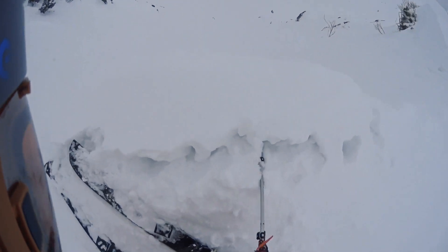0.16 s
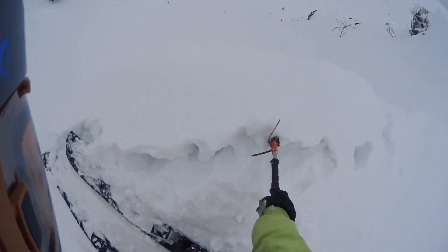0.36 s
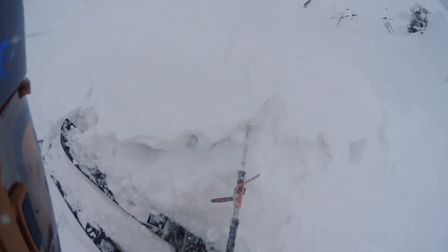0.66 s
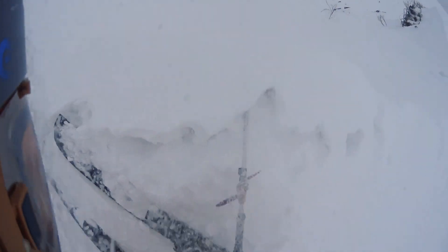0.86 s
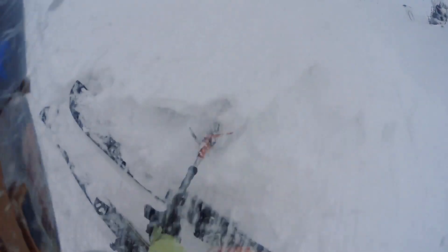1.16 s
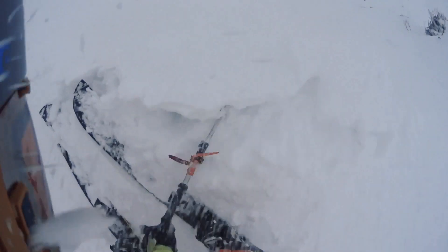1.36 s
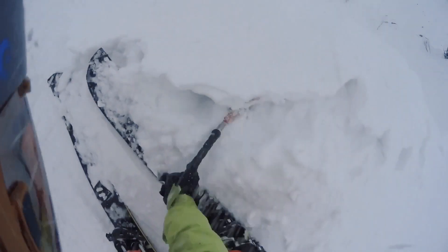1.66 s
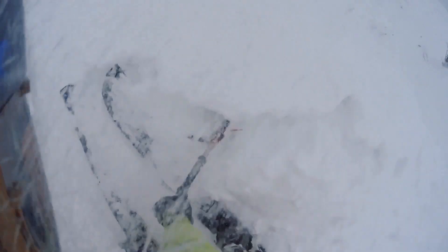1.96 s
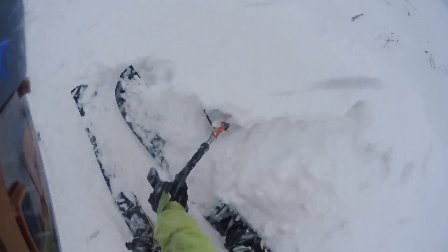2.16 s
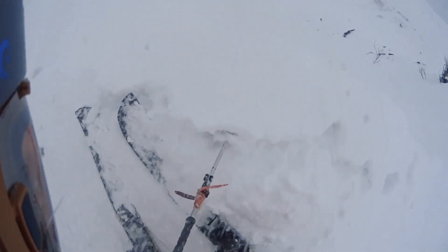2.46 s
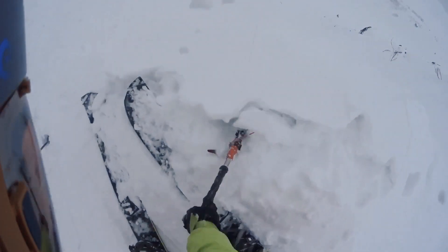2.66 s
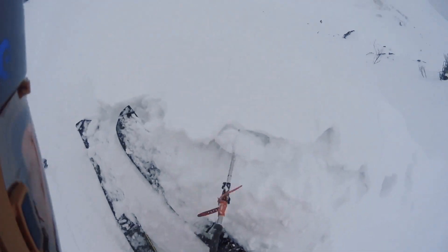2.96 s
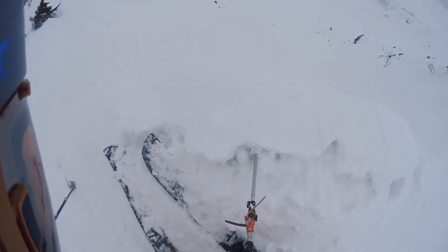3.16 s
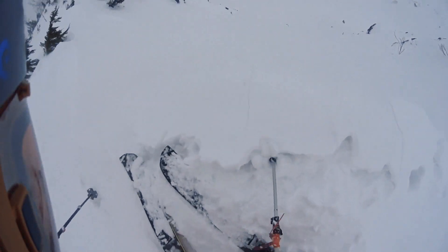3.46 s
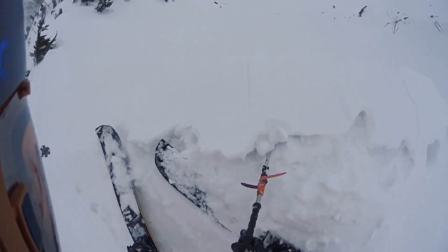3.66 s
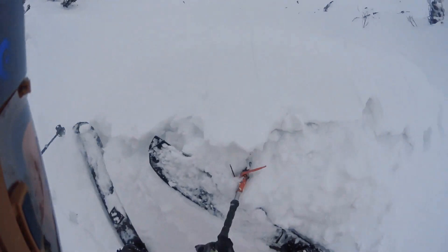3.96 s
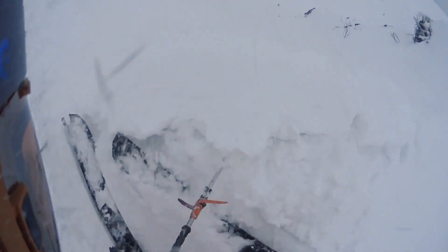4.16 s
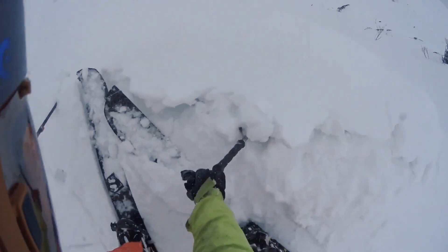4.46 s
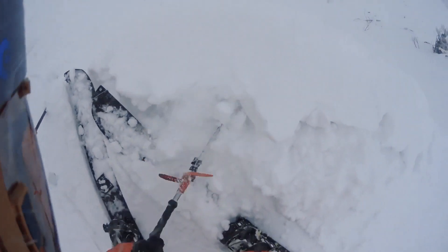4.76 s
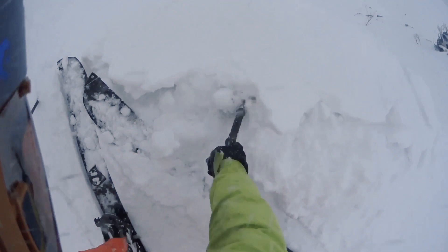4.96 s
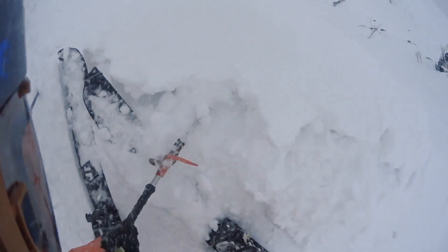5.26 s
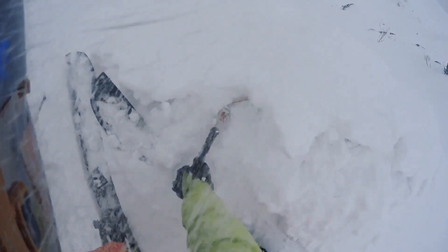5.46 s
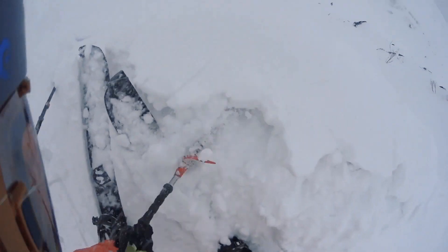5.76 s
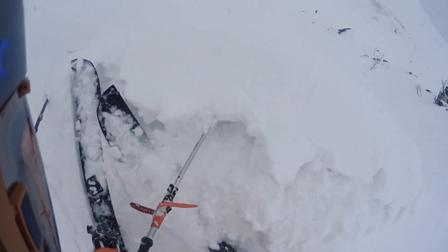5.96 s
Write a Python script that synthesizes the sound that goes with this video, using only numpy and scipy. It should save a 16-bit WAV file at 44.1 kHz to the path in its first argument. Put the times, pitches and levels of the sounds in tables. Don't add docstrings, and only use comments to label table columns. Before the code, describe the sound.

Outdoors in a snowstorm, a small body-worn camera is buffeted by low, throbbing wind. Driven snow hisses in ragged puffs over its shell, with small thuds, glassy pings and sharp ice ticks. The impacts thin out around three seconds, leaving mostly wind, then return as a dense crackling flurry after four seconds before easing at the end. Very close stereo, the sharpest ticks mostly on the right.

```python
import sys
import numpy as np
from scipy import signal
from scipy.fft import rfft, irfft
from scipy.io import wavfile
from scipy.ndimage import uniform_filter1d

SR = 44100
rng = np.random.default_rng(int(sys.argv[2]) if len(sys.argv) > 2 else 0)


def how_loud(loudness_db):
    steps = np.asarray(loudness_db, float) / 20
    return 10 ** steps


def store_wav(level_fs):
    pcm = np.round(np.clip(np.atleast_2d(level_fs), -1, 1) * 32767)
    wavfile.write(sys.argv[1], SR, pcm.T.astype(np.int16))


N = 269451
T = np.arange(N) / SR
HZ = np.fft.rfftfreq(N, 1 / SR) + 1e-3


def unit(x):
    return x / np.sqrt(np.mean(x ** 2))


def walk(rate_hz):
    hold = int(SR / rate_hz)
    steps = np.repeat(rng.standard_normal(N // hold + 1), hold)
    smooth = uniform_filter1d(uniform_filter1d(steps, hold), hold)
    return 0.7 * smooth[:N]


def curves(table):
    time_s, *columns = np.transpose(table)
    return [np.interp(T, time_s, column) for column in columns]


def bumps(table):
    out = np.zeros((2, N))
    for middle_s, length_s, *change_db in table:
        slope_share = 0.58 if change_db[0] < 0 else 1
        near = slice(max(int((middle_s - length_s) * SR), 0), int((middle_s + length_s) * SR))
        height = 1 - 2 * np.abs(T[near] - middle_s) / length_s
        out[:, near] += np.outer(change_db, np.clip(height / slope_share, 0, 1))
    return out


def ring(x, modes):
    out = 0
    for k, (pitch_hz, width_hz, level_db) in enumerate(modes):
        resonance = signal.iirpeak(pitch_hz, pitch_hz / width_hz, SR)
        out = out + (-1) ** k * how_loud(level_db) * signal.lfilter(*resonance, x)
    return out


def grains(per_s, spread_db):
    arrival, sign, size = rng.random((3, N))
    clicks = (arrival < per_s / SR) * np.sign(sign - 0.5)
    return unit(clicks * how_loud(-spread_db * np.log(1.002 - size)))


def add(out, start_s, near, far, level_db, pan_db, lag=7):
    i, struck = int(start_s * SR), int(pan_db < 0)
    out[struck, i:i + len(near)] += near * how_loud(level_db) / np.abs(near).max()
    far_level = how_loud(level_db - abs(pan_db))
    out[1 - struck, i + lag:i + lag + len(far)] += far * far_level / np.abs(far).max()


def rumble(deep_db, flutter_db, gap_db):
    # pitch_hz [Hz], level_db [dB per Hz]
    eddy_colour = [(20, -24), (45, -4), (80, -2.5), (140, 0.5), (250, -2.5), (400, -7), (700, -13.5),
                   (1100, -27), (1800, -27), (2400, -62.5), (3000, -34), (4000, -33.5), (11000, -49.5)]
    pitch_hz, level_db = np.transpose(eddy_colour)
    colour = how_loud(np.interp(np.log(HZ), np.log(pitch_hz), level_db))
    shared, left, right = rfft([grains(900, 1.97) for _ in range(3)]) * colour
    own = np.clip((HZ / 3200) ** 2 + 0.022, 0, 1)
    lag_s = np.array([[0], [0.00068]])
    pair = np.sqrt(1 - own) * shared * np.exp(-2j * np.pi * HZ * lag_s)
    pair = pair + np.sqrt(own) * np.array([left, right])
    pair = pair / np.std(irfft(pair, N))
    throb_db = 1.6 * walk(24.82) + 2.0 * walk(60)
    out = 0
    for octave in range(9):
        place = np.clip(np.log2(HZ / 40), 0, 8) - octave
        band = irfft(pair * np.cos(np.pi / 2 * np.clip(place, -1, 1)) ** 2, N)
        gust_db = deep_db + 4.5 if octave < 2 else flutter_db + 5.0
        if octave < 6:
            gust_db = gust_db + 0.4 * max(octave - 3, 0) * (flutter_db + gap_db + 31)
        out = out + band * how_loud(gust_db + throb_db + 4.1 * walk(30))
    return out


def at_ports(shared, left, right):
    # pitch_hz [Hz], alike [0-1], left_lead [radians], left_minus_right_db [dB]
    port_hiss = [(1240, 1, 2.01, -1), (1920, 1, 1.23, -3.5), (3030, 1, 2, -6), (4020, 0.84, 1.26, -3.5),
                 (5200, 0.32, 2, -3), (6400, 0.55, 3, -3.5), (8700, 0.54, 2, -3), (8800, 0, 4.5, -2),
                 (10500, 0.5, -7.5, -0.5)]
    pitch_hz, *columns = np.transpose(port_hiss)
    alike, lead, pan_db = (np.interp(HZ, pitch_hz, column) for column in columns)
    alike = np.clip(alike, 0, 1)
    turn = np.array([np.ones_like(lead), np.exp(-1j * lead)])
    both = np.sqrt(alike) * rfft(shared) * turn
    local = np.sqrt(1 - alike) * rfft([left, right])
    return irfft((both + local) * how_loud(np.array([pan_db, -pan_db]) / 2), N)


def snow(shell_db, port_db, spray_db):
    # pitch_hz [Hz], width_hz [Hz], level_db [dB]
    shell_modes = [(1550, 446, 4.5), (1897, 358, 6.5), (2197, 183, 5.5)]
    port_modes = [(2832, 590, 0)]
    spray_modes = [(4035, 470, -1.5), (5300, 820, -1), (6170, 1200, 1), (7180, 1530, -0.5),
                   (8490, 1830, -7), (11000, 880, -10)]
    patchy = how_loud(1.07 * walk(30) + 0.75 * walk(70) + 2.85 * walk(160))
    on_shell, on_port, on_grille = (
        at_ports(*(grains(7000, 3.66) * patchy for _ in range(3))) for _ in range(3))
    shell = unit(ring(ring(on_shell, [(1670, 13000, 0)]), shell_modes))
    shell = shell * how_loud(shell_db + 1.5 + 2.0 * walk(50))
    port = unit(ring(ring(on_port, [(3100, 1500, 0)]), port_modes))
    port = port * how_loud(port_db - 0.42 + 1.8 * walk(50))
    low_spray = ring(on_grille, spray_modes[:2]) * how_loud(1.7 * walk(50))
    high_spray = ring(on_grille, spray_modes[2:]) * how_loud(1.7 * walk(45))
    spray = unit(low_spray + high_spray) * how_loud(spray_db + 3.0)
    lull_db = np.minimum(spray_db + 41.5, 0)
    far = signal.lfilter([1, -0.5], 1, rng.standard_normal((2, N))) * how_loud(lull_db - 38.0)
    return shell + port + spray * how_loud(0.1 * lull_db) + far


def pings():
    # start_s [s], level_db [peak dB]
    ping_list = [(1.081, -22), (1.2825, -17), (1.464, -11), (1.56, -13), (1.8143, -16), (2.1585, -16),
                 (2.27, -15), (2.5107, -18), (2.6339, -21), (2.644, -22), (2.684, -23), (2.696, -22),
                 (2.7297, -14), (2.744, -19), (4.6164, -21), (4.7272, -15), (4.912, -16), (5.6517, -17)]
    out, t = np.zeros((2, N)), T[:700]
    sound = np.sin(2 * np.pi * 4110 * t) * (1 - np.exp(-t / 0.0006)) * np.exp(-t / 0.0019)
    for start_s, level_db in ping_list:
        add(out, start_s, sound, sound, level_db + 2.0, pan_db=-4.5)
    return out


def knocks():
    # start_s [s], level_db [peak dB], pitch_hz [Hz]
    knock_list = [(.145, -14, 2000), (0.431, -11, 1780), (.5005, -12, 2190), (0.586, -18, 1860),
                  (0.7498, -10, 1540), (.8207, -15, 910), (0.8207, -13, 1300), (0.821, -9, 1900),
                  (0.998, -10.5, 1600), (1.2692, -11.5, 1550), (1.499, -9, 1500), (1.5484, -6, 1900),
                  (1.74, -8.5, 2180), (1.759, -12, 1620), (2.103, -10, 1530), (2.165, -14, 1620),
                  (2.1827, -3.5, 1690), (2.2692, -10.5, 2020), (2.4163, -16.5, 1740), (2.521, -11, 1800),
                  (2.529, -9, 1650), (2.5744, -3, 1720), (2.6727, -10, 1640), (3.7962, -10, 1730),
                  (4.0422, -9, 1810), (5.917, -18, 1600), (5.924, -18, 1490), (5.941, -27, 1150),
                  (5.953, -31, 950), (6.012, -29, 1500), (5.86, -32, 1600), (2.472, -30, 790),
                  (2.482, -31, 900), (2.2902, -19, 1850), (2.3252, -23, 2100), (2.4557, -24, 1500),
                  (2.7986, -25, 1870), (2.7262, -16, 1540), (.61, -14, 1730), (.9243, -20, 1650),
                  (1.068, -19, 1740), (1.3318, -8, 1780), (1.602, -9, 1830), (1.9987, -16, 1830),
                  (4.171, -11.5, 1530), (4.183, -10, 1610), (4.315, -14, 1820), (4.3352, -11, 1700),
                  (4.46, -18, 1650), (4.5316, -14, 1990), (4.6523, -11, 1850), (4.7267, -10, 2020),
                  (4.9092, -13, 1920), (5.3941, -12, 2000), (4.8692, -22, 2050), (5.101, -11, 1510),
                  (5.1622, -5.5, 1720), (5.3702, -13.5, 1730), (5.662, -11, 1720)]
    out, t = np.zeros((2, N)), T[:900]
    for start_s, level_db, pitch_hz in knock_list:
        modes = np.sin(2 * np.pi * pitch_hz * t) + 0.62 * np.sin(2 * np.pi * (pitch_hz + 480) * t)
        modes = modes + 0.18 * np.sin(2 * np.pi * 2200 * t) * np.exp(-t / 0.0016)
        sound = modes * (1 - np.exp(-t / 0.00064)) * np.exp(-t * pitch_hz ** 0.5 / 0.078)
        add(out, start_s, sound, sound, level_db, pan_db=-6)
    return out


def ice():
    # start_s [s], level_db [peak dB], bright_db [dB], dip_db [dB]
    hard_grains = [(1.005, -4, -2, 7), (1.4337, -3, -1, 12), (1.5176, -1.5, -4, 9), (1.865, -4.5, -3, 7),
                   (2.1314, -1, -5.5, 12), (2.543, -5.5, 3, 8.5), (3.5491, -3, -3.5, 7), (3.555, -7, -6, 8),
                   (3.9263, -3.5, 5, 7.5), (4, -5.5, -14, 11.5), (4.1306, -2, -4, 8.5),
                   (4.192, -2.5, -2, 6), (4.196, -5, 3, 15), (4.204, 2.5, -6, 14), (4.2147, -1.5, -8, 13.5),
                   (4.246, -1, -4, 15), (4.2987, -3, -1, 12), (4.341, -3, 3, 6.5), (4.4458, -1, -4.5, 19),
                   (4.4968, -3, -5, 7), (4.499, -5, -9, 6), (4.695, -2.5, -10, 9), (4.8058, 0, -2, 7),
                   (4.882, -3.5, -2, 10), (5.0191, -3, -3, 3), (5.129, -3.5, -7, 8), (5.1692, -6, -4, 7),
                   (5.1738, 9, 1, 11), (5.2695, -5, -2, 7), (5.2758, 2.5, -1, 9), (1.428, -10, -6, 5),
                   (3.934, -14, 4, 2), (4.123, -15, -1, 2), (5.135, -4, -10, 1), (5.281, -8, 3, 4),
                   (.497, -14, -14, 1), (2.733, -12, -9, 1), (4.0894, -6.5, -19, 0), (4.158, -12, -12, 1),
                   (4.386, -15, -6, 5), (2.2907, -14, -6, 0)]
    # start_s [s], level_db [peak dB], bright_db [dB], left_minus_right_db [dB]
    glancing_grains = [(0.089, -12, -18, -22), (0.419, -13, -28, -10), (.447, -9, -15, -9),
                       (0.5007, -10, -18, -23), (1.1153, -6, -1, -13), (1.414, -5, -3, -8),
                       (1.454, -3, -5, 10), (1.471, -3, 2, -10), (1.532, -2.5, 0, -10),
                       (1.9547, -7, -10, -15), (1.9632, -5, -9, -9), (2.0195, -7.5, -9, -13),
                       (2.5125, -9, -16, -5), (3.7715, -9, -29, -19), (3.809, -8, -29, -12),
                       (3.818, -10, -26, -19), (3.828, -4, -10, 6), (3.8517, -6.5, 3, 11),
                       (3.899, -8.5, -12, -12), (3.958, -8.5, -20, -9), (4.1455, -2.5, -6, 5),
                       (4.186, -5.5, -12, -11), (4.276, -4.5, -6, -9), (4.816, 1, -3, -11),
                       (4.848, -3.5, 2, -12), (4.871, -0.5, -2, -8), (5.2568, -3, 0, -11),
                       (5.3167, -4, 0, 11), (5.4045, -5.5, -9, -17), (4.224, -8, -5, -10)]
    # start_s [s], level_db [peak dB]
    sparks = [(0.4312, -14), (0.736, -22), (0.8214, -12.5), (0.9775, -7), (1.572, -5), (1.68, -22),
              (1.7428, -11), (2.1203, -15), (2.2012, -12), (2.2282, -6), (2.27, -5.5), (3.667, -19),
              (2.601, -25), (6.02, -20), (2.645, -10), (2.6517, -7), (2.669, -16), (4.0425, -28),
              (4.33, -14), (4.4762, -15), (4.801, -7), (4.889, -7), (5.5051, -10), (5.48, -9), (5.653, -10),
              (6.091, -22), (5.7097, -9.5), (5.744, -18)]
    hard = [(s, db, bright_db, -11, dip_db) for s, db, bright_db, dip_db in hard_grains]
    glancing = [(s, db, bright_db, pan_db, 7.5 + 0.77 * db) for s, db, bright_db, pan_db in glancing_grains]
    return hard + glancing + [(s, db, 9, -7, 2.5) for s, db in sparks]


def ticks():
    out, t = np.zeros((2, N)), T[:400]
    hits = ice()
    chance = rng.standard_normal((len(hits), len(t) + 1))
    crack_band = signal.butter(1, (3600, 11500), "band", fs=SR)
    cracks = signal.lfilter(*crack_band, chance)[:, 1:] * np.exp(-t / 0.00028)
    for (start_s, level_db, bright_db, pan_db, dip_db), crack, c in zip(hits, cracks, chance):
        tones = np.sin(2 * np.pi * 3050 * (1 + 0.041 * c[0]) * t)
        tones = tones + 0.5 * np.sin(2 * np.pi * 4100 * t + c[2]) + 0.3 * np.sin(2 * np.pi * 5100 * t)
        cavity = tones * (1 - np.exp(-t / 0.00013)) * np.exp(-t / 0.00093)
        rim = np.sin(2 * np.pi * 6850 * (1 + 0.032 * c[1]) * t) * np.exp(-t / 0.00049)
        crack = (crack / np.abs(crack).max() + 0.32 * rim) * how_loud(bright_db - 2.5)
        hit_db = level_db + 2.5 + 0.54 * max(dip_db, 0)
        add(out, start_s, cavity + crack, cavity + 0.34 * crack, hit_db, pan_db)
    return out


def scene():
    # time_s [s], gust_db [dB], eddy size as deep_rumble_db [dB]
    wind = [(0, -29, 0), (.25, -29.5, -0.5), (.61, -27.5, 4), (.83, -29, -1), (1.16, -29.5, 4.5),
            (1.41, -30.5, 5), (1.82, -29, -0.5), (2.11, -30, -0.5), (2.35, -28, 1.5), (2.77, -30, -2.5),
            (2.99, -28, 0), (3.47, -29, -0.5), (3.68, -25.5, 5.5), (3.96, -29.5, -0.5), (4.54, -27, 1.5),
            (5.05, -31, 6), (5.62, -26.5, -0.5), (6.11, -31, 3.5)]
    # middle_s [s], length_s [s], gust_change_db [dB], deep_change_db [dB]
    eddies = [(.08, 0.17, -4, 3), (.46, 0.051, -2.5, 2.5), (.54, 0.23, -2.5, 1.5), (.86, 0.059, -8, 10),
              (1.72, 0.28, 1, 0), (3.38, 0.41, 2.5, 2.5), (4.77, 0.058, 0.5, -5), (5.17, 0.26, 2, 1),
              (1.24, 0.1, -11, 1), (1.48, 0.051, -6.5, 0), (1.535, 0.055, -7, -6), (1.89, 0.14, -4, 7),
              (2.04, 0.067, -6.5, 5), (2.11, 0.1, -0.5, -4), (2.18, 0.065, -4.5, 8), (2.26, 0.11, 1.5, -12),
              (2.84, 0.23, -6.5, 4), (3.56, 0.22, -1, -3), (3.65, 0.14, -3.5, 3), (4.02, 0.083, -5.5, 3),
              (4.25, 0.24, -2, 9), (4.58, 0.067, -4.5, 2.5), (4.7, 0.13, -5, -0.5), (4.87, 0.25, -8, -1),
              (5.0, 0.048, 5, 8), (5.28, .06, -1, -10), (5.41, 0.09, -5, 9.5), (5.48, 0.089, 0, 11.5),
              (5.55, 0.077, -1.5, -8), (.49, 0.047, -4.5, -2), (3.4, 0.11, 0.5, 2), (5.22, .07, 5, -6),
              (1.68, 0.071, 2, -6), (5.82, 0.2, -4, 2.5), (.3, 0.13, 3, -2), (.7, .1, 0.5, -3),
              (1.03, .1, -2.5, 2.5), (1.33, 0.09, 1.5, 1.5), (1.62, 0.061, 0.5, -3), (1.97, .08, 1.5, 1),
              (2.42, 0.13, 0.5, -1), (2.66, 0.08, -2.5, 1), (3.08, .15, 1, -5), (3.22, .1, -1.5, -6),
              (3.85, .1, -1, -1), (4.14, 0.056, -3, -1), (4.425, .05, -4, 2), (4.64, 0.064, -2.5, 3),
              (5.7, .08, -1.5, -3), (6.0, 0.082, 1.5, 0)]
    # time_s [s], load_db [dB], fineness_db [dB]
    snowfall = [(0, -34.5, -15), (.28, -36.5, -35), (.33, -35, -11), (.53, -35, -15), (.59, -33.5, -2.5),
                (.87, -37, 2), (1.19, -37.5, 1), (1.72, -29, 0), (2.12, -25, 0.5), (2.27, -40.5, -0.5),
                (2.48, -43.5, 3.5), (2.7, -34.5, -1), (2.99, -47, 4), (3.58, -42.5, -6.5),
                (4.0, -33.5, -14), (4.15, -29.5, 0.5), (5.5, -29, 0.5), (6.11, -53, 2.5)]
    # middle_s [s], length_s [s], strength_db [dB], aim_at_port_db [dB]
    puffs = [(.09, 0.1, 3, 1.5), (.62, 0.093, 9.5, -3), (.73, 0.075, 5.5, 1.5), (.98, .18, 15, 0),
             (1.11, 0.13, 16.5, 1.5), (1.41, 0.52, 11.5, 0.5), (1.76, 0.14, -5.5, -4),
             (2.03, 0.32, 1.5, 1.5), (2.53, 0.068, 7, 3.5), (2.72, 0.088, 9.5, -3.5),
             (2.845, 0.24, -12, -4), (3.7, 0.36, 5.5, 2), (3.81, 0.053, 7.5, 6), (3.92, 0.25, 7, 8.5),
             (4.08, 0.18, 5.5, 9.5), (4.17, 0.14, 9.5, -12), (4.33, .06, 2, -4), (4.38, 0.073, -5.5, -4),
             (4.57, 0.12, -3.5, -2.5), (4.66, 0.038, 8.5, -10), (4.76, 0.13, 6, -1), (4.81, 0.27, 2.5, 5.5),
             (4.93, 0.22, 4.5, 2), (5.26, 0.045, 0, 6), (5.42, 0.21, 4.5, -3), (5.6, 0.14, -2.5, -7),
             (5.71, 0.12, 7.5, -4), (5.84, 0.16, -6, -3.5), (5.945, 0.055, 0, -6), (4.078, 0.028, -2.5, -4),
             (4.75, .035, -2, -1), (4.728, .025, 3, -1), (1.558, .025, -3, -2), (4.975, .07, 2, -0.5),
             (4.83, 0.026, 3, 1), (1.257, 0.023, -3, -1), (1.54, .02, -2.5, 6), (3.885, 0.018, -1, -2),
             (.575, 0.022, -2, -4), (1.747, 0.022, 0, -1), (4.03, .04, -4, 1), (1.5, 0.046, -1, 2),
             (1.55, 0.028, 3.5, -1), (4.15, 0.027, -7, 3), (4.42, 0.037, -4, -2), (2.61, 0.045, -0.5, -6),
             (2.3, 0.13, 0, -2), (3.88, 0.036, 1, -1), (3.97, .05, 3, 5), (5.22, .06, -1.5, 1.5),
             (5.08, 0.091, 2, -0.5), (3.2, .3, 0.5, -2)]
    gust, size = curves(wind)
    slack, deep = bumps(eddies)
    load, fine = curves(snowfall)
    puff, aim = bumps(puffs)
    flutter_db = gust + slack
    gap_db = 0.65 * np.minimum(puff, 0)
    port_db = -34 + 0.59 * (load + puff + 35) - 0.079 * fine + aim
    spray_db = load + fine + 0.79 * puff + 0.39 * aim
    background = rumble(flutter_db + size + deep, flutter_db, gap_db) + snow(load + puff, port_db, spray_db)
    return background + pings() + knocks() + ticks()


def gain_dips():
    ahead_s, attack_s, hold_s, release_s = 0.0034, 0.0077, 0.0089, 0.012
    dips_db = np.zeros(N)
    for start_s, *_, depth_db in ice():
        near = slice(int((start_s - ahead_s) * SR), int((start_s + 0.15) * SR))
        t = T[near] - start_s + ahead_s
        shape = np.clip(t / attack_s, 0, 1) * np.exp(-np.clip(t - hold_s, 0, None) / release_s)
        dips_db[near] = np.maximum(dips_db[near], max(depth_db, 0) * shape)
    return dips_db


def low_pass(x):
    return signal.sosfilt(signal.butter(12, 12300, fs=SR, output="sos"), x)


def record(dry):
    top_hz, tick_top_hz = 10980, 12500
    wave = rfft(np.clip(dry * how_loud(-gain_dips()), -1, 1))
    body = irfft(wave * how_loud(-np.clip((HZ - top_hz) / 2.5, 0, 100)), N)
    top_band = np.clip((HZ - top_hz) / 200, 0, 1) * np.clip((tick_top_hz - HZ) / 600, 0, 1)
    top = irfft(wave * top_band, N)
    sharp = uniform_filter1d(top ** 2, size=300) / uniform_filter1d(top ** 2 + 1e-12, size=6000)
    leak = how_loud(-15) * top * sharp ** 6 / (sharp ** 6 + 1500)
    mix = np.clip(body + leak, -1, 1)
    return low_pass(mix)


dry = scene()
out = record(dry)
store_wav(out)
```